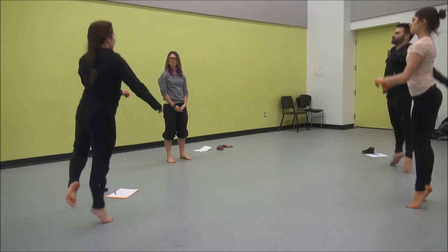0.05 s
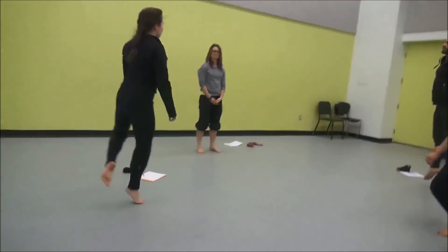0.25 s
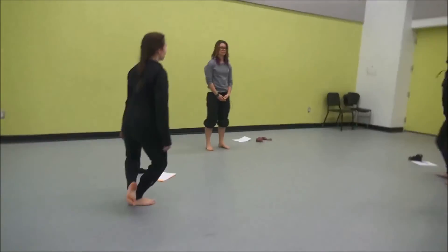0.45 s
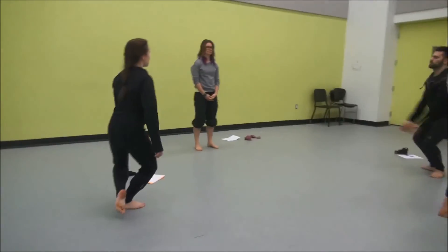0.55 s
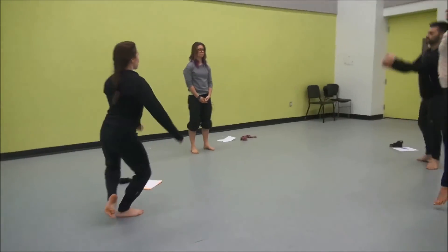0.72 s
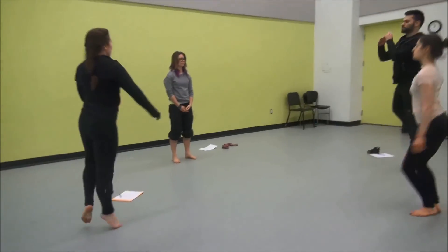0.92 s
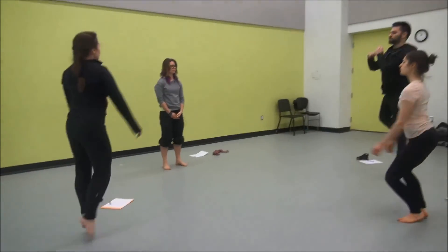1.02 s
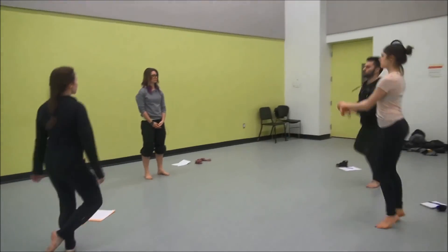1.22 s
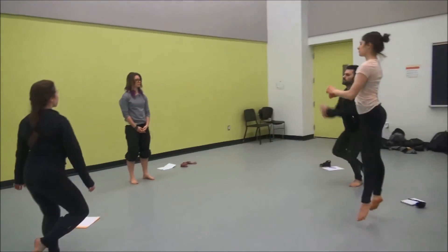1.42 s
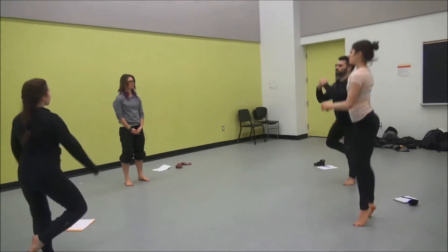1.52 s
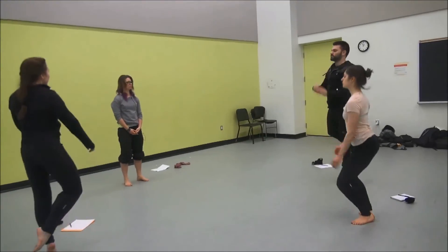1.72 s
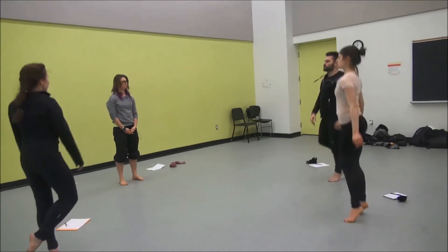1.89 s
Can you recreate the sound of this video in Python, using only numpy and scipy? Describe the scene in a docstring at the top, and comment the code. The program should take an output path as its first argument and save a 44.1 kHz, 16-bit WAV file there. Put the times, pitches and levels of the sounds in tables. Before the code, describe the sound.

Bare feet thud softly on a sprung floor as dancers hop, in uneven clusters with light toe ticks and faint brushing of soles and clothes. The landings echo a little in a large studio, a few metres from the microphone.

```python
"""Three barefoot dancers hop on a sprung floor, a few metres from a hand-held microphone in a large studio.
Toes tick on the vinyl, then ball and heel push the floor into a low thud that the walls throw back.
Soles and clothes brush between the landings. Behind them sit steady ventilation, a faint
electrical whine and the microphone's own hiss."""
import sys
import numpy as np
from scipy import signal
from scipy.fft import rfft, irfft
from scipy.io import wavfile

SR = 44100
rng = np.random.default_rng(int(sys.argv[2]) if len(sys.argv) > 2 else 0)


def transcribe(signal):
    """Save signal, clipped to [-1, 1], as a 16-bit WAV file at the path in sys.argv[1]."""
    frames = np.atleast_2d(signal).T
    limited = np.clip(frames, -1, 1)
    pcm = np.round(limited * 32767).astype(np.int16)
    wavfile.write(sys.argv[1], SR, pcm)


N = 85995

# Spectrum of the ventilation's room tone: frequency_hz, relative_density_db
VENTILATION_SPECTRUM = [(15, -12), (30, 9), (60, 5.5), (130, 8), (250, -5.5), (350, -6), (550, -8),
                        (900, -12), (1300, -17), (2000, -21.5), (4000, -25), (8000, -28), (15500, -29.5)]
# The studio's diffuse answer to a footfall: centre_hz, level_db, t60_s, build_up_s
REVERB_BANDS = [(48.6, -9.5, 0.2, 0.017), (83.3, -22.5, 0.83, 0.0069), (175, -25.5, 0.71, 0.023),
                (389, -39, 1, 0.067), (774, -41, 1.0, 0.077), (1465, -48, 0.93, 0.028),
                (2590, -50, 0.75, 0.022), (5650, -51.5, 0.89, 0.029), (10200, -52, 0.98, 0.026)]
# Reflections off walls and ceiling: delay_s, gain_db
WALL_ECHOES = [(0.052, -18.5), (0.073, -22.5), (.116, -14.5), (.166, -20), (0.217, -18)]
# Soles and clothes rubbing: start_s, length_s, level_db, centre_hz
BRUSH_STROKES = [(0.143, 0.088, -50, 2670), (0.27, 0.21, -54.5, 2450), (.485, .06, -49.5, 2960),
                 (0.557, 0.27, -72, 2730), (0.846, 0.13, -51, 2650), (1.001, 0.12, -55.5, 3250),
                 (1.25, .06, -55, 4700), (1.321, 0.038, -52, 2850), (1.333, 0.04, -47.5, 6350),
                 (1.58, 0.19, -56, 3640), (1.692, 0.23, -58.5, 3520)]
# Sharp ticks of toes and joints: start_s, energy_db, upper_edge_hz, relative_snap_db
TOE_TICKS = [(0.488, -23, 4790, -7), (0.5628, -18, 4370, -17), (.568, -10.5, 4040, -26),
             (1.032, -25, 4300, -25), (1.2386, -18.5, 6050, -0.5), (1.257, -28.5, 7040, -45),
             (1.3121, -22, 5800, -16), (1.3163, -11.5, 3920, -14), (1.338, -30, 5000, -14),
             (1.518, -27, 3400, -29), (1.803, -26, 5500, -22)]
# Resonances of the sprung floor: pitch_hz, relative_level_db, t60_s
FLOOR_MODES = [(39.7, -91, 0.092), (58.3, 3, 0.22), (101, 4, .11), (118, -6, 0.017), (180, -46, 0.17),
               (230, -16, 0.051), (317, -4, 0.09)]
# Ball and heel meeting the floor: start_s, strength_db, contact_ms, deep_mode_gain_db
FOOT_CONTACTS = [(-.12, -4, 6.5, 1), (0.037, -14, 13.6, -1.5), (0.186, -34.5, 3.04, 18.5),
                 (0.201, -2, 19.3, 0), (0.22, -17, 5, -4), (0.293, -16.5, 13, 7.5), (.320, -10.5, 12, 2.5),
                 (0.354, -21.5, 13, 8), (0.398, -6, 12.9, 2), (0.487, -19, 13.5, 6),
                 (0.509, -13.5, 10.7, -5), (0.527, -4.5, 14, -2), (.575, -4.5, 8.1, -0.5),
                 (0.596, -3.5, 5.2, -3.5), (.613, -9.5, 8.5, -7), (0.904, -8, 9, -11.5),
                 (.939, -9, 10.7, -6), (.986, -29.5, 10.7, 3), (1.003, -26.5, 10, 6),
                 (1.219, -15.5, 10.4, 3), (1.24, -24.5, 8.4, 3.5), (1.265, -4, 10, -6.5),
                 (1.3234, -10, 6.1, 1.5), (1.3439, -2.5, 7.7, -2), (1.353, -10, 6.86, 10.5),
                 (1.3628, -20.5, 6.9, 10), (1.415, -14.5, 7, -4), (1.467, -22.5, 2.7, -7),
                 (1.656, -20, 3.6, -7), (1.668, -13.5, 11, -5), (1.685, -8.5, 19.6, -6),
                 (1.714, -25.5, 13.7, 11.5), (1.732, -26.5, 12.7, 1), (1.752, -38, 18.5, 1),
                 (1.79, -43.5, 9.8, 7)]


def undb(db):
    """Decibels to amplitude."""
    return 10 ** (np.asarray(db) / 20)


def unit(x):
    """Scale to rms 1."""
    return x / np.sqrt(np.mean(x ** 2))


def band(hz, width, order=2):
    """Noise of rms 1 in a band around hz; width is relative to the centre."""
    f = np.arange(N // 2 + 1) * SR / N + 1e-3
    detuning = (f / hz - hz / f) / width
    return unit(irfft(rfft(rng.standard_normal(N)) / (1 + detuning ** 2) ** (order / 2), N))


def since(start_s):
    """Seconds since start_s, zero before."""
    return np.maximum(np.arange(N) / SR - start_s, 0)


def fade(t60_s):
    """Decay by 60 dB in t60_s."""
    return np.exp(-np.log(1000) * since(0) / t60_s)


def through(x, response):
    """Pass a sound through an impulse response."""
    return signal.fftconvolve(x, response)[:N]


def room_tone():
    """Steady ventilation, a faint electrical whine, and separate microphone hiss in each channel."""
    f = np.arange(N // 2 + 1) * SR / N + 1
    hz, db = np.array(VENTILATION_SPECTRUM).T
    colour = undb(np.interp(np.log(f), np.log(hz), db))
    ventilation = unit(irfft(rfft(rng.standard_normal(N)) * colour, N))
    hiss = np.array([band(hz=11500, width=1.5) for _ in range(2)])
    whine = np.sqrt(2) * np.sin(2 * np.pi * 13188 * since(0))
    return undb(-41) * ventilation + undb(-62) * hiss + undb(-75) * whine


def studio_reverb():
    """The diffuse sound of the footfalls fills the room and dies away, octave by octave."""
    t = since(0)
    coarse_t = t[::100]
    start_s, strength_db = np.array(FOOT_CONTACTS).T[:2]
    age = np.maximum(coarse_t[:, None] - start_s, 0)
    drive = undb(0.99 * strength_db)  # the room follows each footfall almost dB for dB
    out = np.zeros(N)
    for centre_hz, level_db, t60_s, build_up_s in REVERB_BANDS:
        tails = drive * (1 - np.exp(-age / build_up_s)) * np.exp(-np.log(1000) * age / t60_s)
        envelope = np.interp(t, coarse_t, np.linalg.norm(tails, axis=1))  # tails add in power
        out += undb(level_db) * envelope * band(centre_hz, width=1, order=4)
    return out


def wall_echoes(direct):
    """Walls and ceiling return the sound to the microphone, later and weaker."""
    t = since(0)
    return sum(undb(gain_db) * np.interp(t - delay_s, t, direct, left=0)
               for delay_s, gain_db in WALL_ECHOES)


def brushes():
    """Grainy friction of soles and clothes that swells quickly and trails off."""
    out = np.zeros(N)
    for start_s, length_s, level_db, centre_hz in BRUSH_STROKES:
        age = since(start_s) / (0.22 * length_s)  # the stroke peaks at age 1
        out += undb(level_db) * age * np.exp(1 - age) * band(centre_hz, width=1, order=3)
    grain_db = 5 * band(hz=180, width=6)
    return out * unit(undb(grain_db))


def crack(start_s, low_hz, high_hz, rise_s=0.00055):
    """One skin crack: a millisecond burst of energy 1, spread evenly between two frequencies."""
    age = since(start_s) / rise_s
    burst = rng.standard_normal(N) * age * np.exp(-np.minimum(age, 50))
    phase = np.angle(rfft(burst))
    f = np.arange(N // 2 + 1) * SR / N + 1
    passband = 1 / np.sqrt((1 + (low_hz / f) ** 12) * (1 + (f / high_hz) ** 12))
    return unit(irfft(passband * np.exp(1j * phase), N)) / np.sqrt(N)


def toe_ticks():
    """Toes and joints tick: returns the cracks and, apart, the bright snaps on top of them."""
    cracks = sum(undb(energy_db) * crack(start_s, low_hz=2000, high_hz=upper_edge_hz)
                 for start_s, energy_db, upper_edge_hz, _ in TOE_TICKS)
    snaps = sum(undb(energy_db + snap_db) * crack(start_s, low_hz=11500, high_hz=15500)
                for start_s, energy_db, _, snap_db in TOE_TICKS)
    return cracks, snaps


def floor_thuds(deep_below_hz=80, level_db=-5.5):
    """Each contact is a smooth push that rings the floor, deeper at some spots than at others."""
    force, deep_force, floor = np.zeros((3, N))
    for start_s, strength_db, contact_ms, deep_mode_gain_db in FOOT_CONTACTS:
        contact_s = contact_ms / 1000
        progress = np.minimum(since(start_s) / contact_s, 1)
        pulse = np.sin(np.pi * progress) ** 2 * 2 / (contact_s * SR)  # sums to 1
        force += undb(strength_db) * pulse
        deep_force += undb(strength_db + deep_mode_gain_db) * pulse
    for pitch_hz, mode_db, t60_s in FLOOR_MODES:
        ring = undb(mode_db) * np.cos(2 * np.pi * pitch_hz * since(0)) * fade(t60_s)
        floor += through(deep_force if pitch_hz < deep_below_hz else force, ring)
    return -undb(level_db) * floor


def scene():
    """The dancers a few metres off, dead centre, in the sound of the room; the snaps stay dry."""
    thuds = floor_thuds()
    cracks, snaps = toe_ticks()
    skin = cracks + brushes()
    room_response = unit(rng.standard_normal(N) * fade(t60_s=1)) / np.sqrt(N)
    skin_reverb = undb(-4.5) * through(skin, room_response)
    reflections = wall_echoes(thuds) + studio_reverb() + skin_reverb
    return room_tone() + reflections + skin + snaps + thuds


def record(dry):
    """The hand-held microphone drops the bass below 28 Hz and cuts the top above 15.9 kHz."""
    low_cut = signal.butter(2, 28, "high", fs=SR, output="sos")
    high_cut = signal.ellip(10, 0.2, 70, 15900, fs=SR, output="sos")
    return signal.sosfilt(high_cut, signal.sosfilt(low_cut, dry))


dry = scene()
out = record(dry)
transcribe(out)
```